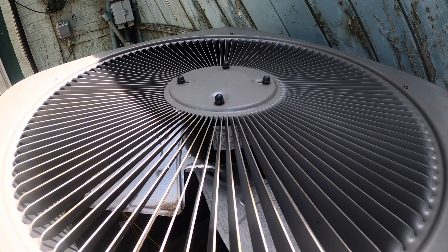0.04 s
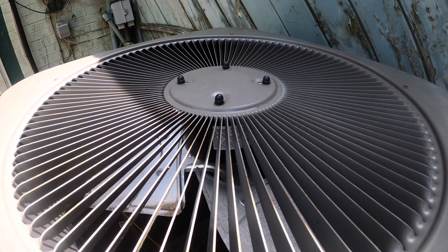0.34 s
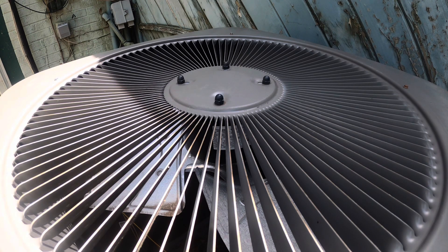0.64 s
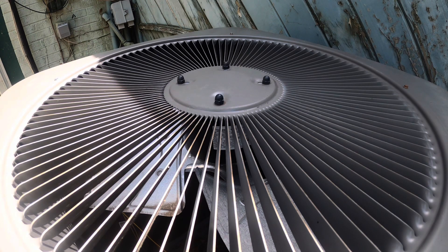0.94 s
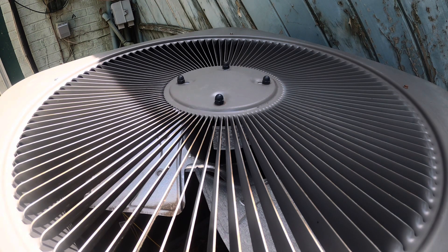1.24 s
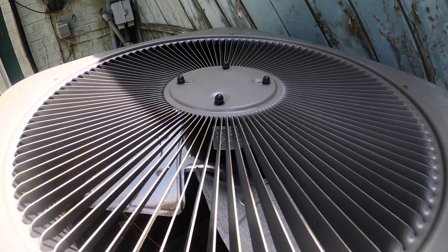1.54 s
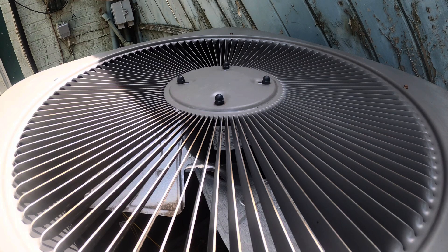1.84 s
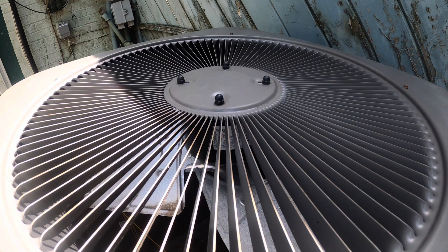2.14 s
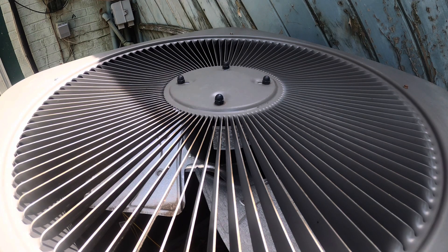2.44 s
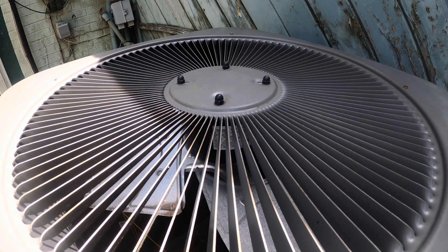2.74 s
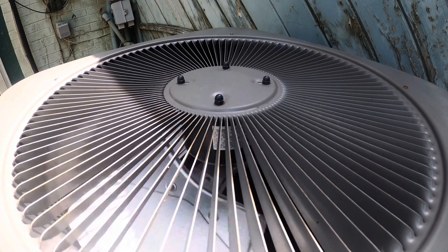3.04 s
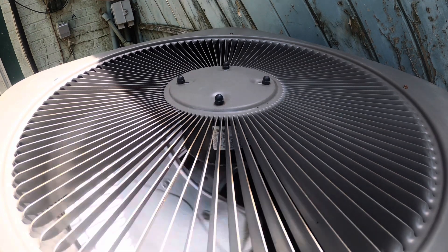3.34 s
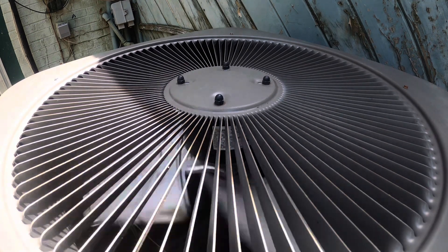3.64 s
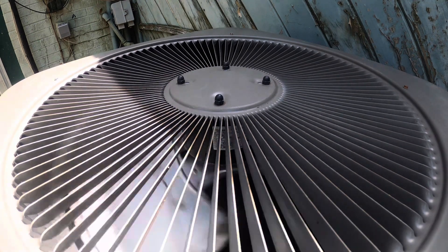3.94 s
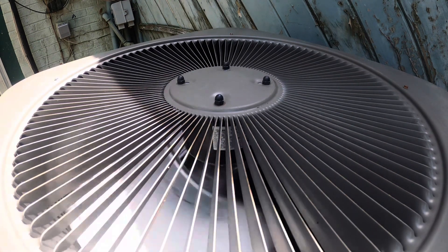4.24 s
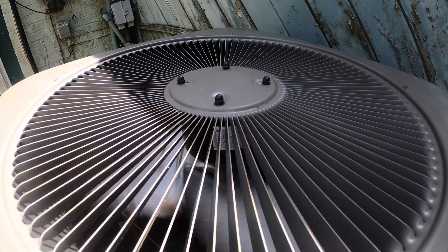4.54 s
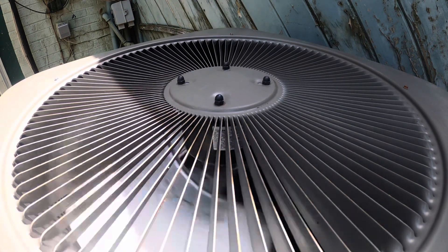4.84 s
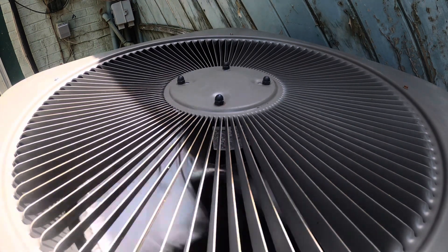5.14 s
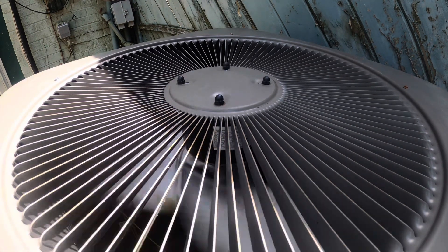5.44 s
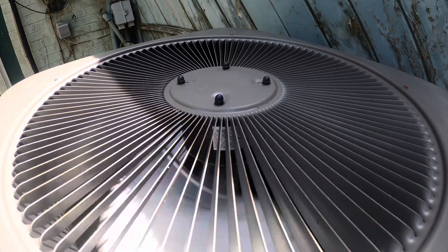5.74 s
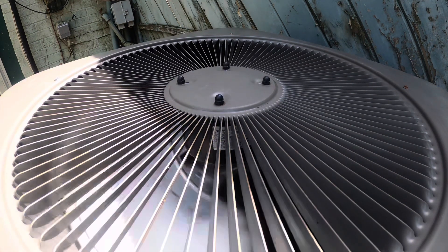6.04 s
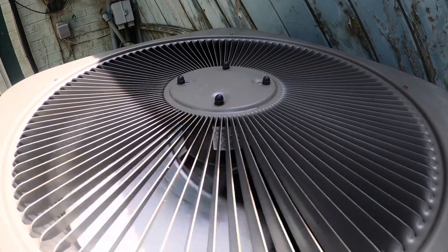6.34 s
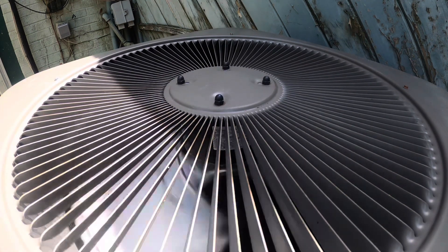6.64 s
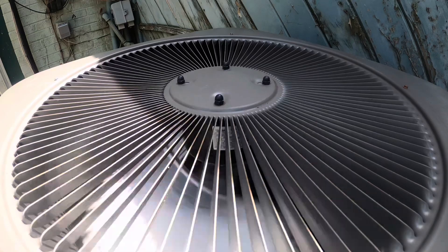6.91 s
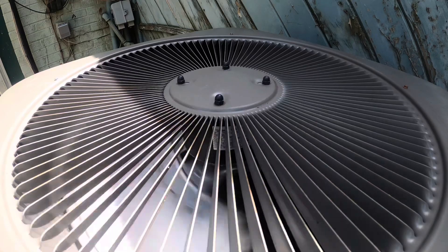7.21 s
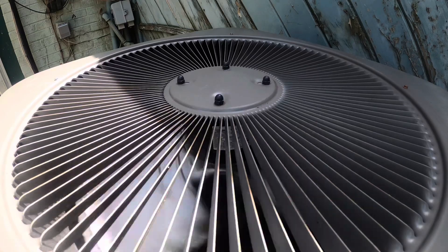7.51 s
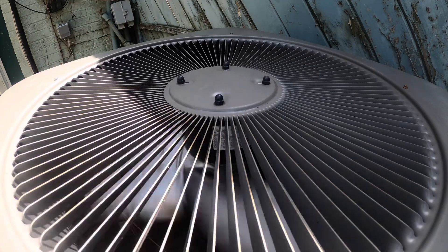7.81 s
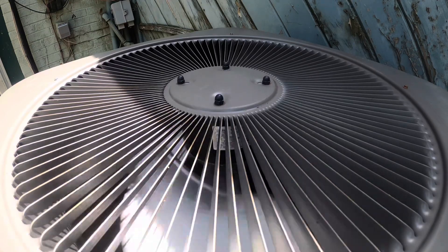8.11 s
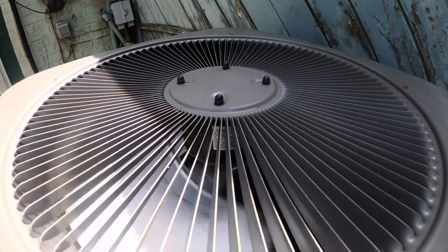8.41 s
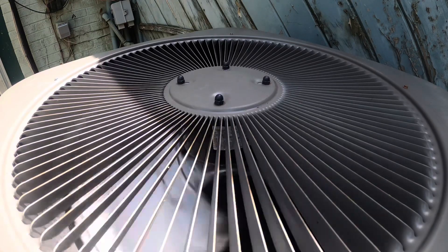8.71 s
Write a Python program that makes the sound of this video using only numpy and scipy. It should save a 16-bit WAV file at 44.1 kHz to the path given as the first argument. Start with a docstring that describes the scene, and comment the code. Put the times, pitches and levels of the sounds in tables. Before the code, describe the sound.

Outdoors, faint birds chirp over a distant hum and soft puffs of breeze. About three seconds in, an air conditioner switches on with a sharp metallic clunk. Its compressor drones, clatters and hisses, and metal scrapes briefly as the fan spins up. A pulsing whine crests and settles while the fan becomes a steady, throbbing roar, blowing rough gusts onto the microphone just above the grille.

```python
"""An outdoor air conditioner starts, with the microphone just above its fan grille.
First, birds chirp over a distant hum. Near 2.9 s the contactor clunks and the compressor labours,
droning and clattering up to speed. Panels sing and metal scrapes as the fan spins up to a roar.
From about 3.7 s its draught throws gusts at the microphone: a limiter ducks the peaks and the
channels merge in the wind, while the compressor's pulsing whine crests and settles."""
import sys
import numpy as np
from scipy import signal
from scipy.fft import rfft, irfft, next_fast_len
from scipy.io import wavfile
from scipy.ndimage import uniform_filter1d

SR = 44100
rng = np.random.default_rng(int(sys.argv[2]) if len(sys.argv) > 2 else 0)


def generate_wav(signal):
    """Clip the signal to [-1, 1] and save it as 16-bit WAV at the path in sys.argv[1]."""
    frames = np.transpose(np.atleast_2d(signal))
    scaled = np.clip(frames, -1, 1) * 32767
    pcm = np.round(scaled).astype(np.int16)
    wavfile.write(sys.argv[1], SR, pcm)


N = 395577
TIME = np.arange(N) / SR
START_S = 2.875  # power reaches both motors


def amp(db):
    """Decibels to gain."""
    return np.exp(np.asarray(db) * (np.log(10) / 20))


def unit(x):
    """Scales to rms 1."""
    return x / np.sqrt(np.mean(x ** 2) + 1e-20)


def read(points, hz):
    """A curve's value on a log-frequency axis."""
    f, value = np.transpose(points)
    return np.interp(np.log(hz + 1), np.log(f + 1), value)


def add(mix, s, sound):
    """Mixes a sound in from time s."""
    part = mix[..., max(round(s * SR), 0):][..., :sound.shape[-1]]
    part += sound[..., :part.shape[-1]]


def drift(rate_hz):
    """Smooth random modulation of rms 1 that changes about rate_hz times a second."""
    coarse = rng.standard_normal(2048)
    hz = np.fft.rfftfreq(len(coarse), TIME[-1] / len(coarse))
    smooth = unit(irfft(rfft(coarse) / (1 + (hz / rate_hz) ** 4)))
    return np.interp(TIME, np.linspace(0, TIME[-1], len(smooth)), smooth)


def noise(spectrum, likeness, size=N):
    """Two channels of coloured noise, partly alike, at rms 1."""
    n = next_fast_len(size, real=True)
    hz = np.fft.rfftfreq(n, 1 / SR)
    common, apart = rfft(rng.standard_normal((2, n)))
    same = np.clip(read(likeness, hz), -1, 1)
    mid, side = np.sqrt(1 + same) * common, np.sqrt(1 - same) * apart
    return unit(irfft(np.array([mid + side, mid - side]) * amp(read(spectrum, hz)), n)[:, :size])


def ringing(x, hz, width):
    """What a resonance passes of x, at rms 1."""
    b, a = signal.iirpeak(hz, hz / width, fs=SR)
    return unit(signal.lfilter(b, a, signal.lfilter(b, a, x)))


def panned(x, balance):
    """Tilts two channels to the left or right, frequency by frequency."""
    n = next_fast_len(N, real=True)
    db = read(balance, np.fft.rfftfreq(n, 1 / SR))
    return irfft(rfft(x, n) * amp([db / 2, -db / 2]), n)[:, :N]


def swell(t, middle, length, edge=1):
    """A smooth bump of height 1; more edge gives steeper sides."""
    return np.exp(-(2 * ((t - middle) / length) ** 2) ** edge)


def swells(cues):
    """A gain envelope with one bump for each cue of t/s, length/s, level/dB."""
    return sum(amp(db) * swell(TIME, s, length) for s, length, db in cues)


def ramp(s, rise):
    """Opens from 0 to 1, starting at time s."""
    return np.clip((TIME - s) / rise, 0, 1)


def falling(s, scale):
    """Glides from 1 to 0, halfway at time s."""
    return .5 - .5 * np.tanh((TIME - s) / scale / 2)


# colour of the outdoor bed: f/Hz, relative density/dB
AIR_COLOUR = [(20, -30), (34, -5), (55, -2), (81, -12.5), (118, -9), (204, -20), (243, -19), (441, -25),
              (487, -27.5), (1030, -31), (1610, -36), (2920, -40.5), (3940, -43.5), (6320, -46),
              (13000, -81)]
# stereo image of the open air: f/Hz, left-right likeness/0-1
AIR_LIKENESS = [(60, 0.99), (280, 0.94), (620, 0.94), (1350, 0.66), (2950, 0.5), (6400, 0.2)]
# partials of a distant machine: f/Hz, relative level/dB
DISTANT_HUM = [(43.1, -46.5), (177.6, -52), (236.9, -47), (651.4, -66.5), (1001, -56), (1061, -63.5),
               (1534, -65.5)]
# breeze on the microphone: t/s, length/s, level/dB
BREEZE_PUFFS = [(0.529, 0.062, -27.5), (0.944, 0.21, -36), (1.836, 0.069, -32), (2.12, 0.087, -39),
                (2.573, 0.051, -31)]
# the yard's pan: f/Hz, left minus right/dB
YARD_BALANCE = [(60, 0.5), (300, -0.5), (1200, 3), (4000, 3)]


def yard():
    """The outdoor bed: a wash of air, a distant machine's hum and soft puffs of breeze."""
    wash = amp(-37.5 + .9 * drift(4)) * noise(AIR_COLOUR, AIR_LIKENESS)
    hum = np.zeros(N)
    for hz, db in DISTANT_HUM:
        gain = amp(db - 2 + 3.6 * drift(3.9))
        hum += gain * np.sin(2 * np.pi * hz * TIME + (.5 + hz / 600) * drift(16))
    hum += amp(-66) * ringing(rng.standard_normal(N), hz=2230, width=180)  # its fuzzy overtone
    rumble = [(12, -14), (45, 3.5), (110, -7.5), (250, -20), (800, -46), (14000, -130)]  # f/Hz, level/dB
    breeze = swells(BREEZE_PUFFS) * noise(rumble, AIR_LIKENESS)
    return panned(wash + hum + breeze, YARD_BALANCE)


def whistle(length, glide, flutter_hz, taper):
    """A fluttering note that glides through three pitches; taper is the share spent fading."""
    t = np.arange(0, length, 1 / SR)
    flutter = unit(uniform_filter1d(rng.standard_normal(SR), size=60))[:len(t)]
    hz = np.interp(t, [0, length / 2, length], glide) + flutter_hz * flutter
    return np.sin(2 * np.pi * np.cumsum(hz) / SR) * signal.windows.tukey(len(t), taper)


def echoes(x, wet_db, t60=.35):
    """Adds scattered reflections from fence and walls, different in each ear."""
    t = np.arange(SR // 2) / SR
    tail = rng.standard_normal((2, len(t))) * amp(-60 * t / t60)
    tail /= np.linalg.norm(tail, axis=1, keepdims=True)
    return x + amp(wet_db) * signal.fftconvolve(x[None], tail, axes=1)[:, :N]


# gliding chirps: t/s, length/s, start f/Hz, middle f/Hz, end f/Hz, level/dB
BIRD_CHIRPS = [(.151, .042, 2850, 3280, 2850, -55), (.181, .042, 2650, 2540, 2560, -52),
               (.215, 0.024, 2750, 2850, 2900, -53), (.25, 0.06, 2260, 2180, 2080, -56),
               (0.765, 0.057, 2780, 2854, 2900, -52), (0.812, 0.058, 2900, 2990, 2900, -55),
               (.843, .02, 3730, 3280, 2700, -59), (1.28, 0.061, 2360, 2370, 2280, -55),
               (1.334, 0.03, 3800, 3180, 2100, -54), (1.356, 0.061, 2620, 2830, 2800, -52),
               (1.4, 0.082, 2280, 2200, 2250, -53.5), (1.925, 0.045, 3540, 3360, 3300, -50),
               (1.984, .04, 3250, 2700, 2100, -56), (2.54, 0.065, 2750, 2900, 2920, -54),
               (2.635, 0.063, 2230, 2260, 2400, -58)]
# thin lisping notes, mostly in falling pairs: t/s, length/s, f/Hz, flutter/Hz, level/dB
BIRD_LISPS = [(.02, 0.14, 6380, 300, -61), (.11, .1, 5520, 190, -61.5), (.145, .11, 5960, 190, -63.5),
              (0.527, .15, 6500, 210, -61), (.61, .14, 5900, 400, -61), (1.13, .14, 6700, 190, -63),
              (1.23, 0.17, 6130, 230, -59), (1.88, .17, 6580, 260, -63), (1.96, 0.18, 6080, 170, -59),
              (2.48, .14, 6450, 210, -61), (2.41, .1, 3520, 260, -58), (2.64, .1, 7220, 170, -68)]


def birds():
    """Gliding chirps and, further off, thin unsteady lisps, all to the left."""
    chirps, lisps = np.zeros((2, N))
    for s, length, *glide, db in BIRD_CHIRPS:
        add(chirps, s, amp(db) * whistle(length, glide, flutter_hz=80, taper=.5))
    for s, length, hz, flutter_hz, db in BIRD_LISPS:
        add(lisps, s, amp(db) * whistle(length, [hz, hz, hz], flutter_hz, taper=.94))
    warble = amp(1.3 * drift(100))
    return (echoes(chirps * warble, wet_db=-6) + echoes(lisps * warble, wet_db=0)) * amp([[2], [-1]])


# the start-up clunk and the knocks after it: t/s, relative ring level/dB, relative clack level/dB
KNOCK_CUES = [(2.874, -50, -28), (2.877, -47, -16), (2.879, -14.5, -29), (2.8865, -40, -19),
              (2.9, -31, -27), (2.921, -30, -38), (2.986, -42, -36), (3.054, -43, -39), (3.094, -42, -37),
              (3.186, -38, -39), (3.203, -37, -39), (3.225, -46, -36), (3.931, -39, -43)]
# the cabinet's modes: f/Hz, relative level/dB, t60/s
CABINET_MODES = [(219, 0.5, 0.39), (322, 4.5, 0.062), (390, 1, 0.059), (502, -7, 0.34), (541, -10.5, 0.34),
                 (770, -12, 0.26), (1040, -2, .07), (1330, 6, 0.04), (1447, 3.5, 0.15), (1550, -15, 0.35),
                 (1680, -13, 0.13), (2340, -14, 0.18), (3090, -12, 0.074), (4355, -5, .07),
                 (4530, -3.5, 0.087), (6040, -18, .08)]
# colour of a clack: f/Hz, relative density/dB
CLACK_COLOUR = [(150, -24), (350, 14.5), (700, -7), (1480, 9.5), (2600, -12), (4500, -4.5), (7500, -9),
                (10000, -22), (14000, -32)]
# stereo image of the air conditioner: f/Hz, left-right likeness/0-1
MACHINE_LIKENESS = [(60, 0.32), (130, 0.29), (280, 1), (620, 1), (1350, 0.7), (2950, 0.65), (6400, 0.2)]


def clunk():
    """The contactor snaps shut and the compressor kicks: sharp clacks that ring the cabinet."""
    out, t = np.zeros((2, N)), np.arange(SR // 2) / SR
    attack = 1 - np.exp(-t / .00043)
    clack_decay = np.exp(-t / .011) + .24 * np.exp(-t / .025)
    for s, ring_db, clack_db in KNOCK_CUES:
        phases = rng.uniform(0, 2 * np.pi, (len(CABINET_MODES), 1, 1))
        phases = phases + .091 * rng.standard_normal((len(CABINET_MODES), 2, 1))  # a little width
        ring = sum(amp(db - 60 * t / t60) * np.sin(2 * np.pi * hz * t + phase)
                   for (hz, db, t60), phase in zip(CABINET_MODES, phases))
        clack = noise(CLACK_COLOUR, MACHINE_LIKENESS, size=len(t)) * clack_decay
        add(out, s, (amp(ring_db) * ring + amp(clack_db + 3.5) * clack) * attack)
    return out


SHAFT_HZ, ATTACK_S, LABOUR_S = 59.22, .022, .38  # the compressor's speed, fade-in and time spent straining


def labour():
    """1 while the compressor's motor strains, else 0."""
    return ramp(START_S, ATTACK_S) * falling(START_S + LABOUR_S, .015)


def settling(from_db, to_db, halfway_s, scale_s):
    """Gain of a compressor layer: switched on, then easing down as the pressure builds."""
    return ramp(START_S, ATTACK_S) * amp(to_db + (from_db - to_db) * falling(halfway_s, scale_s))


# waves of shaking while the motor labours: t/s, length/s, boost/dB
SHAKE_WAVES = [(3.02, 0.078, 3.5), (3.102, 0.055, 3.5), (3.235, 0.06, 4)]


def surge_db():
    """Extra level from the waves of shaking."""
    return sum(db * swell(TIME, s, length) for s, length, db in SHAKE_WAVES)


# sheet-metal resonances: f/Hz, width/Hz, boost/dB
CASING_PEAKS = [(463, 49, 3.5), (680, 50, 3), (910, 50, 4.5), (1086, 45, 2), (1525, 170, 4.5),
                (1720, 74, 4.5), (2160, 190, 4.5), (2850, 130, 3.5), (3550, 150, 3.5), (4170, 140, 2.5),
                (4720, 92, 5.5), (5130, 200, 3.5), (5870, 260, 6), (6300, 260, 6.5), (6820, 200, 6.5),
                (7300, 300, 4), (8350, 250, 2), (10950, 63, 3), (11800, 400, 5)]


def casing(x):
    """Each panel resonance rings along with what shakes it."""
    out = x
    for hz, width, db in CASING_PEAKS:
        out = out + (amp(db) - 1) * signal.lfilter(*signal.iirpeak(hz, hz / width, fs=SR), x)
    return out


# the compressor's low partials: multiple of shaft speed, relative level/dB
HUM_PARTIALS = [(1, 0.5), (2, -4), (3, -5.5), (4, -15), (5, -17), (6, -13), (7, -11.5), (8, -17), (9, -11),
                (10, -30), (11, -29), (12, -16.5), (13, -25.5), (14, -22)]


def compressor_hum(angle, waver_rad=.22, inrush_db=9.5, labour_db=1):
    """Each turn of the shaft shakes the casing; the first rush of current jolts the hum."""
    hum = np.zeros((2, N))
    for k, db in HUM_PARTIALS:
        phase = rng.uniform(0, 2 * np.pi) + np.array([[.5], [-.5]]) / np.sqrt(k)
        hum += amp(db + 2.4 * drift(7)) * np.cos(k * angle + phase + waver_rad * np.sqrt(k) * drift(18))
    inrush = np.exp(-abs(TIME - START_S) / .08)
    boost = amp(labour_db * labour() + inrush_db * inrush)
    return settling(-25, -37.5, halfway_s=4.5, scale_s=.4) * boost * unit(hum)


# colour of the buzz: f/Hz, relative level/dB
BUZZ_COLOUR = [(1200, 6), (1550, 1.5), (2100, -3.5), (2800, -5.5), (4000, -7), (4550, -9.5), (5200, -7),
               (5900, -10.5), (7500, -15), (8300, -22), (10000, -30.5)]


def compressor_buzz(angle):
    """The shaft's high harmonics buzz through the casing, wider in stereo as they rise."""
    orders = np.arange(22, 170)
    phases = rng.uniform(0, 2 * np.pi, len(orders)) + orders / 70 * rng.standard_normal((2, len(orders)))
    levels = amp(read(BUZZ_COLOUR, orders * SHAFT_HZ) + 2 * rng.standard_normal(len(orders)))
    spectrum = np.zeros((2, 2049), complex)
    spectrum[:, orders] = levels * np.exp(1j * phases)
    turn = (angle + .025 * drift(55)) / (2 * np.pi) % 1  # jittery position in a one-turn wavetable
    buzz = np.array([np.interp(turn, np.arange(len(wave)) / len(wave), wave) for wave in irfft(spectrum)])
    return settling(-41.5, -53, halfway_s=6, scale_s=.5) * unit(casing(buzz))


# colour of the refrigerant's hiss: f/Hz, relative density/dB
HISS_COLOUR = [(600, -30), (1500, 0.5), (2700, 2), (4500, 0), (6000, -11.5), (7500, -12), (8700, -9.5),
               (10000, -14.5), (12000, -21), (13800, -23), (14500, -25)]


def refrigerant_hiss(angle):
    """Each turn pushes out a puff of refrigerant, louder while the motor labours and shakes."""
    hiss = noise(HISS_COLOUR, MACHINE_LIKENESS) * amp(2 * np.cos(angle) + 1.9 * drift(35))
    boost = amp(1.5 * labour() + .77 * surge_db())
    return settling(-38, -72.5, halfway_s=4.5, scale_s=.66) * boost * unit(casing(hiss))


# waves of the motor's drone: t/s, length/s, level/dB
DRONE_CUES = [(2.98, 0.025, -22.5), (3.053, 0.035, -22), (3.112, 0.053, -20.5)]
# colour of the rattle: f/Hz, relative density/dB
RATTLE_COLOUR = [(30, -18), (100, 9), (230, -0.5), (480, -2), (700, -2), (1100, -2.5), (1600, -16.5),
                 (2300, -21), (5000, -32.5), (14000, -67.5)]


def strain(drone_hz=119.5):
    """The straining motor drones at twice the mains rate and rattles the casing; the rattle dies away."""
    phase = 2 * np.pi * drone_hz * TIME + np.array([[.3], [-.3]]) + .3 * drift(12)
    drone = np.sqrt(2) * np.sin(phase) * swells(DRONE_CUES)
    rattle = unit(casing(noise(RATTLE_COLOUR, MACHINE_LIKENESS) * amp(1.6 * drift(60))))
    shaking = labour() * amp(-28 + surge_db())
    tail = (1 - labour()) * settling(-33, -73, halfway_s=5, scale_s=.47)
    return drone + rattle * (shaking + tail)


def clatter(taps_per_s=85, damping=4):
    """Loose panels tap unevenly while the motor labours, each tap a choked ring of the cabinet."""
    t = np.arange(SR // 8) / SR
    taps = (rng.random(N) < taps_per_s / SR) * amp(4.9 * rng.standard_normal((2, N)))
    ring = sum(amp(db - 60 * damping * t / t60) * np.sin(2 * np.pi * hz * t)
               for hz, db, t60 in CABINET_MODES)
    return labour() * amp(-36.5 + surge_db()) * unit(signal.oaconvolve(taps, ring[None], axes=1)[:, :N])


def fan_speed(t, spin_up_s=1.85, knee=7):
    """Share of full speed at time t: the fan gathers speed evenly, then levels off."""
    run = np.maximum((t - START_S) / spin_up_s, 1e-6)
    return run / (1 + run ** knee) ** (1 / knee)


def fan_db(t, full_db, db_per_doubling):
    """Level at time t of a layer that follows the fan's speed."""
    return full_db + db_per_doubling * np.log2(fan_speed(t))


# brief lulls in the draught: t/s, length/s, eddy level change/dB
DRAUGHT_LULLS = [(3.97, .07, -9.5), (4.983, 0.047, -8), (5.162, .06, -4.5), (5.444, 0.049, -1),
                 (5.78, 0.085, -4), (5.963, 0.055, -7.5), (6.356, .04, -8), (7.142, .05, -1),
                 (7.35, .05, -6), (7.75, .14, -1.5), (8.11, .09, -1)]


def lull_db(t):
    """How far the draught has slackened at time t."""
    return sum(db * swell(t, s, length) for s, length, db in DRAUGHT_LULLS)


# the blades' throb: multiple of blade-pass rate, relative level/dB
BLADE_PARTIALS = [(1, 0), (2, -12), (3, -13), (4, -25.5)]
# colour of the roar through the grille: f/Hz, relative density/dB
ROAR_COLOUR = [(60, 0.5), (200, 3.5), (450, 4), (700, -0.5), (1050, -0.5), (1450, -6), (2000, -6),
               (3250, -9), (4400, -14.5), (6000, -23.5), (7400, -29), (9500, -45), (12000, -53.5),
               (14000, -74.5)]
# colour of the wake's low rumble: f/Hz, relative density/dB
WAKE_COLOUR = [(5, -0.5), (15, 7), (28, 7.5), (55, 6.5), (90, 2), (130, -3.5), (200, -13), (400, -25),
               (1000, -47), (14000, -130)]


def fan(full_pass_hz=42.3):
    """The blades throb, and their turbulent wake roars through the grille."""
    angle = 2 * np.pi * np.cumsum(full_pass_hz * fan_speed(TIME)) / SR
    throb = np.zeros(N)
    for k, db in BLADE_PARTIALS:
        gain = amp(db + 2 * drift(6.9))
        throb += gain * np.cos(k * angle + rng.uniform(0, 2 * np.pi) + .22 * k * drift(5.9))
    roar = noise(ROAR_COLOUR, AIR_LIKENESS) * amp(.5 * drift(3.3) + .18 * np.cos(angle))
    wake = noise(WAKE_COLOUR, MACHINE_LIKENESS) * amp(2.7 * drift(19) + .5 * lull_db(TIME))
    return (amp(fan_db(TIME, -19.5, db_per_doubling=12)) * unit(throb)
            + amp(fan_db(TIME, -29.5, db_per_doubling=23)) * unit(roar)
            + amp(fan_db(TIME, -19, db_per_doubling=6.6)) * unit(wake))


# panel tones during the spin-up: t/s, length/s, f/Hz, width/Hz, level/dB
PANEL_CUES = [(2.935, .05, 1526, 70, -30), (3.154, 0.028, 1080, 60, -31), (3.218, .06, 1560, 150, -38),
              (3.685, 0.15, 1800, 50, -43.5), (3.797, 0.4, 957, 40, -38), (3.935, .018, 1020, 200, -28),
              (4.04, 0.28, 1830, 40, -48), (4.17, 0.14, 1090, 80, -33.5)]


def singing_panels():
    """Shaken panels sing in brief, fuzzy tones."""
    return sum(amp(db) * swell(TIME, s, length) * ringing(rng.standard_normal(N), hz, width)
               for s, length, hz, width, db in PANEL_CUES)


# metal chafing on metal as the machine shakes: t/s, length/s, level/dB
SCRAPE_CUES = [(3.026, 0.095, -37.5), (3.1, .05, -42), (3.217, 0.05, -48), (3.285, 0.055, -41.5),
               (3.405, .08, -41), (3.508, 0.074, -43), (3.6, 0.086, -42.5), (3.695, 0.11, -41.5),
               (3.808, .06, -48), (3.9, 0.038, -56), (3.985, 0.047, -50), (4.065, 0.04, -46),
               (4.145, 0.075, -45), (4.23, .12, -57)]
# the tubing's modes: f/Hz, relative level/dB
TUBING_MODES = [(2150, 4.5), (2670, 0), (3390, 2.5), (3660, -1), (4340, 0), (4570, 0), (5040, 2), (5800, 2),
                (6170, -0.5), (6560, -5), (7020, -3), (7550, -3), (8270, -8), (10950, -13), (11900, -15)]


def scrapes(slips_per_s=700, t60=.028, pitch_wander=.016):
    """Uneven slips ring the tubing, each a different mix of modes that shift as the contact moves."""
    out, t = np.zeros((2, N)), np.arange(SR // 24) / SR
    hz, db = np.transpose(TUBING_MODES)[:, :, None]
    decay = amp(db - 60 * t / t60)
    bend = 1 + pitch_wander * np.array([drift(7.2) for _ in hz])
    first, last = round(START_S * SR), round((SCRAPE_CUES[-1][0] + .25) * SR)
    slips = rng.random(N) < slips_per_s / SR
    force = amp(np.clip(rng.standard_normal(N), -2, 2))
    mixes = rng.standard_normal((499, 1, len(hz))) + rng.standard_normal((499, 2, len(hz)))
    for i in first + np.flatnonzero(slips[first:last]):
        modes = decay * np.sin(2 * np.pi * hz * bend[:, i, None] * t)
        modes[:, :2] += [.7, -.7]  # a tick on the attack
        add(out, i / SR, force[i] * mixes[i % len(mixes)] @ modes)
    return swells(SCRAPE_CUES) * out / out[:, first:last].std()


# the whine before the gas resonance shapes it: multiple of shaft speed, relative level/dB
WHINE_PARTIALS = [(15, 6.5), (16, -2), (17, -0.5), (18, 1.5), (19, 2.5), (20, -9), (21, -4)]


def shell_whine(angle, settled_hz=1076, sharp_hz=75, fade_db_per_s=.5):
    """Gas rings in the compressor's shell; the resonance starts sharp and sinks."""
    running_s = np.maximum(TIME - START_S - LABOUR_S, 0)
    shell_hz = settled_hz + sharp_hz * np.exp(-running_s / .18)
    tones = np.zeros(N)
    for k, db in WHINE_PARTIALS:  # nearly in step, so the whine throbs once a turn
        detune = (k * SHAFT_HZ - shell_hz) / 45
        gain = amp(db + 2.9 * drift(2.9)) / np.hypot(1, detune)
        tones += gain * np.cos(k * angle - np.arctan(detune) + .3 * drift(2.2))
    puffs = rng.standard_normal(N) * amp(4.4 * np.cos(angle))
    whine = unit(tones) * amp(.98 * drift(40)) + .3 * ringing(puffs, settled_hz, width=250)
    envelope = ramp(3.19, rise=.064) * settling(-28.5, -45, halfway_s=5, scale_s=1.03)
    crest_db = 4 * swell(TIME, middle=4.34, length=.45)
    return envelope * amp(crest_db - fade_db_per_s * running_s) * unit(whine)


def compressor():
    """One slightly unsteady shaft drives the hum, whine, buzz and hiss."""
    angle = 2 * np.pi * np.cumsum(SHAFT_HZ * (1 + .000707 * drift(4.6))) / SR
    return compressor_hum(angle) + shell_whine(angle) + compressor_buzz(angle) + refrigerant_hiss(angle)


# colour of a gust: f/Hz, relative density/dB
GUST_COLOUR = [(25, -5.5), (70, 7.5), (150, 3.5), (300, -2), (500, -10), (800, -18), (1200, -26.5),
               (1800, -38.5), (3000, -52), (6000, -75.5), (14000, -115)]


def gust(length, db, tilt):
    """One eddy bursts on the microphone: a ragged puff of low noise."""
    t = np.arange(SR // 4) / SR
    colour = [(hz, level + tilt * np.log2(np.clip(hz, 150, 1500) / 300)) for hz, level in GUST_COLOUR]
    shape = swell(t, t[-1] / 2, length, edge=1.3)
    flutter = amp(3.47 * unit(uniform_filter1d(rng.standard_normal(len(t)), size=200)))
    air = noise(colour, likeness=[(100, .11), (1000, .44)], size=len(t))
    puff = air * uniform_filter1d(flutter, size=40) * shape
    return amp(db) * unit(puff) * np.sqrt(np.mean(shape ** 2))


# the fan's hardest gusts: t/s, length/s, level/dB, brightness/(dB per octave)
GUST_CUES = [(3.68, 0.12, -21.5, -3.5), (3.887, 0.024, -15.5, -4.5), (4.038, 0.025, -16, 0.5),
             (4.09, 0.021, -15, -1), (4.127, 0.026, -15, 2), (4.182, 0.064, -11.5, 2),
             (4.222, 0.0088, -6, 0), (4.274, 0.046, -8, 1), (4.33, 0.0095, -12.5, 3),
             (4.372, 0.049, -10, -0.5), (4.41, 0.021, -19, 2), (4.445, 0.034, -9.5, 1.5),
             (4.474, 0.013, -9, 2.5), (4.515, 0.033, -12, 3), (4.588, 0.01, -12, 2.5),
             (4.604, 0.016, -14, -2), (4.647, 0.041, -9, 3), (4.688, 0.017, -8.5, 2.5),
             (4.727, 0.015, -16, 5), (4.772, 0.0093, -19, 4), (4.833, 0.042, -10, 4.5),
             (4.91, 0.024, -15.5, 4), (4.95, 0.026, -9, 4), (5.019, 0.011, -17, 6), (5.04, 0.022, -16, 5.5),
             (5.097, 0.0066, -13, 3.5), (5.12, 0.028, -13.5, 3.5), (5.236, .008, -13, -1),
             (5.276, 0.0069, -16, 0), (5.316, 0.019, -14, 5), (5.369, 0.031, -11, 3),
             (5.49, 0.033, -15, 4.5), (5.603, 0.038, -19.5, 1.5), (5.648, 0.009, -18, 0.5),
             (5.685, 0.013, -16, 1), (5.718, 0.025, -14.5, 3.5), (5.815, 0.011, -21, -5),
             (5.856, 0.0063, -14, -2), (5.913, 0.021, -11.5, 0.5), (6.124, .008, -16, 3),
             (6.17, 0.036, -19, 5.5), (6.291, 0.011, -19.5, 4.5), (6.33, 0.025, -16, 5),
             (6.408, 0.0087, -17, 2), (6.494, 0.014, -16.5, 0), (6.548, 0.031, -18, -0.5),
             (6.63, 0.035, -13.5, 5), (6.665, 0.0094, -17, 8.5), (6.689, .01, -9.5, 1.5),
             (6.715, 0.031, -17.5, 5), (6.746, 0.023, -14.5, 4), (6.848, 0.011, -10, 1),
             (6.885, 0.025, -15, 5.5), (6.937, 0.022, -13, 3.5), (6.98, 0.034, -10, 2),
             (7.056, 0.024, -10.5, 2), (7.09, 0.013, -11.5, 2.5), (7.175, 0.014, -9, -11),
             (7.256, 0.029, -12.5, -1.5), (7.3, 0.041, -15, 2.5), (7.406, 0.0075, -14.5, 3),
             (7.425, 0.01, -20, 5.5), (7.47, 0.027, -19.5, 7), (7.519, 0.053, -13.5, 5.5),
             (7.59, 0.038, -16, 6.5), (7.657, 0.012, -13, 3.5), (7.868, 0.02, -13.5, -1.5),
             (7.904, 0.011, -13.5, 0.5), (7.95, 0.027, -14, 3.5), (8.02, 0.009, -12, 3.5),
             (8.038, 0.028, -13.5, 2.5), (8.221, 0.018, -8, 2.5), (8.34, 0.043, -18, 0.5),
             (8.369, 0.012, -9, 0.5), (8.467, 0.05, -16.5, 4), (8.52, 0.042, -16.5, 3),
             (8.55, .007, -21, 3), (8.604, 0.011, -17.5, 6), (8.674, 0.024, -15.5, 5.5),
             (8.71, 0.014, -28, 9), (8.81, 0.033, -14, 0), (8.852, .01, -10.5, 1.5),
             (8.89, 0.026, -15.5, 5), (8.95, 0.037, -15.5, 5)]


def gusts(eddies_from_s=3.9, eddies_per_s=22):
    """The draught buffets the microphone: hard gusts among an uneven stream of weaker eddies."""
    out, eddies = np.zeros((2, N)), []
    for k, (late, long, loud, bright) in enumerate(rng.standard_normal((120, 4))):
        s = eddies_from_s + (k + .35 * late) / eddies_per_s
        if s < TIME[-1]:
            db = fan_db(s, -23.5, db_per_doubling=3.2) + lull_db(s) + 1.5 * loud
            eddies.append((s, .019 * np.exp(.38 * long), db, 1.5 + .47 * bright))
    for s, length, db, tilt in list(GUST_CUES) + eddies:
        puff = gust(length, db, tilt)
        add(out, s - puff.shape[1] / SR / 2, puff)
    return out


# pan of the compressor and metalwork: f/Hz, left minus right/dB
MACHINE_BALANCE = [(60, -5), (130, -0.5), (400, -0.5), (1250, -1.7), (2500, 1), (7500, -1.5), (14000, -12)]


def scene():
    """All layers at the microphone."""
    ambience = yard() + birds()
    machine = clunk() + compressor() + strain() + clatter() + scrapes() + singing_panels()
    return ambience + panned(machine, MACHINE_BALANCE) + fan() + gusts()


# the stereo image closing in the wind: t/s, width/0-1
STEREO_WIDTH = [(3.75, 1), (4.05, .75), (4.3, .25), (4.6, .06), (4.95, 0)]


def record(dry, threshold_db=-9.5, release_db_per_s=90, cutoff_hz=14500):
    """The image narrows to mono, a limiter ducks the peaks and a low-pass trims the top."""
    width = np.interp(TIME, *np.transpose(STEREO_WIDTH))
    mid, side = dry.mean(0), (dry[0] - dry[1]) / 2 * width
    narrowed = np.array([mid + side, mid - side])
    peak_db = 20 * np.log10(abs(narrowed).max(0) + 1e-9)
    fall_db = TIME * release_db_per_s
    held_db = np.maximum.accumulate(peak_db + fall_db) - fall_db
    over_db = np.maximum(held_db - threshold_db, 0)
    limited = narrowed * amp(-.7 * uniform_filter1d(over_db, size=100))
    low_pass = signal.firwin(511, cutoff_hz, window=("kaiser", 9), fs=SR)
    return signal.oaconvolve(limited, low_pass[None], "same")


dry = scene()
out = record(dry)
generate_wav(out)
```